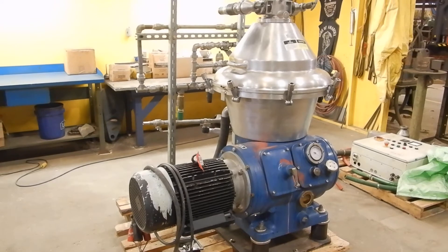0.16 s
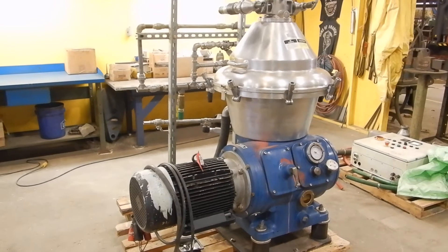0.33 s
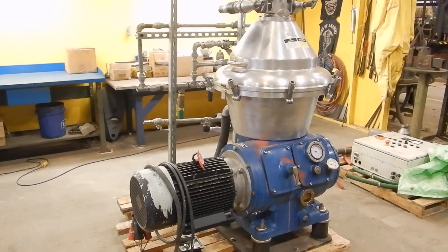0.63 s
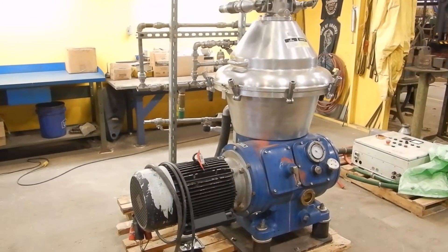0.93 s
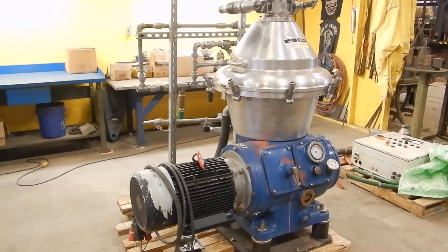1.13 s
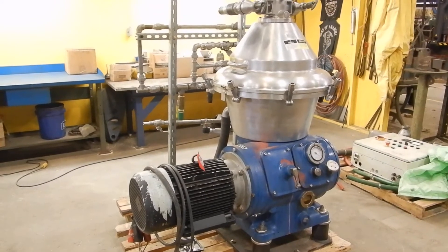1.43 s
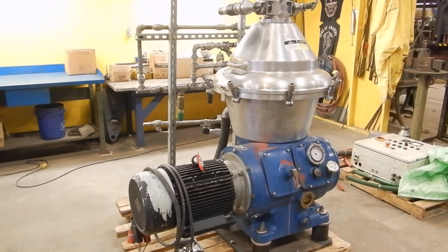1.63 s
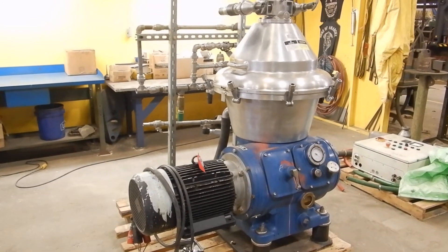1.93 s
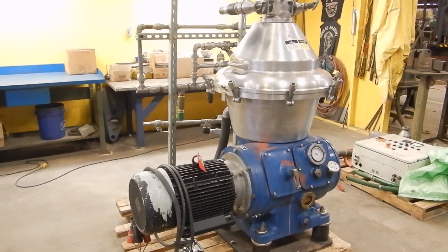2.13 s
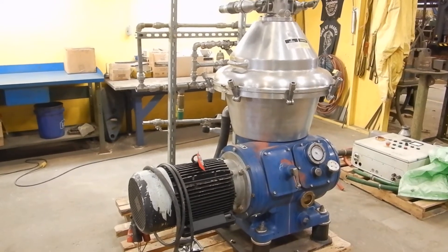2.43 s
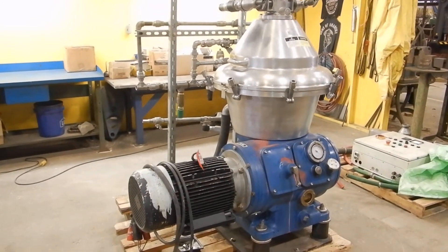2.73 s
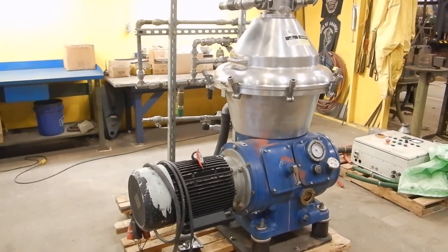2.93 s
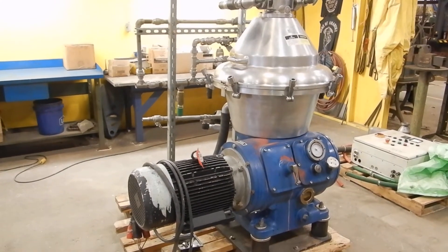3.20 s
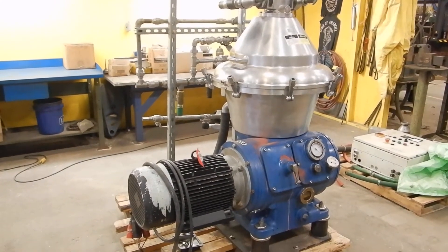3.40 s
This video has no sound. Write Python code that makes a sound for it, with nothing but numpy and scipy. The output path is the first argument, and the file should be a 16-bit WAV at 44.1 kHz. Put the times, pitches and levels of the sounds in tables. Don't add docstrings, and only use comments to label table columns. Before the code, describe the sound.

Close to a running centrifuge indoors: a continuous, shrill, rough-edged whine with a slight cyclic waver, fine gear rattle around it, and a fitful low drone, motor hum and rushing noise beneath.

```python
import sys
import numpy as np
from scipy import signal
from scipy.fft import rfft, irfft, next_fast_len
from scipy.io import wavfile

SR = 44100
rng = np.random.default_rng(int(sys.argv[2]) if len(sys.argv) > 2 else 0)


def wav_out(sig):
    wavfile.write(sys.argv[1], SR, np.round(np.clip(np.atleast_2d(sig).T, -1, 1) * 32767).astype(np.int16))


def attenuation_scalar(level_db):
    decades = np.asarray(level_db, float) / 20
    return 10 ** decades


N = 156996
TIME = np.arange(N) / SR
PAD = next_fast_len(N + 4096)
HZ = np.arange(PAD // 2 + 1) * SR / PAD

CATCH_S = [-.02, .311, .652, 1.006, 1.375, 1.757, 2.169, 2.586, 3.034, 3.518, 4.02]
# place in cycle (0-1), mesh offset f/Hz
HUNT = [
    (0, 0),
    (.07, 12.),
    (.2, 6.5),
    (.45, 1.8),
    (.72, -10.5),
    (.9, -10.),
    (1, 0),
]

MESH_HZ, OCTAVE_HZ = 1662.4, 3322.0
MESH_OFFSETS = [-197.3, -178.7, -144.6, -86.7, -52.7, -45.5, -37.5, -28.9, -18.6, -7.6, 0, 7.7, 15.5, 26.3,
                34, 52.7, 60.5, 68.1, 79.2, 86.7, 94.5, 120.6, 139.4, 192.2, 207.7, 317.8, 404.5]
# level/dB, swell/dB, place of swell in cycle (0-1), unsteadiness (0-1)
MESH_TONES = [(-43, 2.5, 0.5, 0.3), (-43, -1.5, .75, 0.7), (-34, 3, 0.31, 0.2), (-46, 4.5, 0.5, .4),
              (-31.5, -0.5, 0.1, 0.1), (-42, 0.5, 0.7, 0.4), (-38.5, 2.5, 0.7, 0.5), (-38, 10.5, .25, 0.4),
              (-29, 0.5, 0.7, 0.5), (-40.5, 3, .05, 0.6), (-21, 2, 0.75, 0.04), (-42, 3.5, 1, 0.5),
              (-41.5, -1.8, .9, .7), (-35.5, 4, 0.7, 0.4), (-29.5, 2, 1, 0.3), (-43.5, 9, .05, 0.6),
              (-40.5, -1, .4, .6), (-39.5, 1.5, .6, 0.5), (-39.5, 1, 0, 0.9), (-25, 2.5, 0.66, 0.12),
              (-41.5, 1.5, 0.1, 0.5), (-43.5, 1.5, 0.7, 0.8), (-37.5, 2, 0.2, 0.5), (-39.5, 3.5, 0, .5),
              (-40.5, -0.5, .75, .5), (-34, 3, 0.68, 0.21), (-48, 2, 0.4, 0.4)]
OCTAVE_OFFSETS = [-144.3, -115.4, -84, -39.6, -28.6, -18.1, 0, 8.4, 55.9, 86.9, 113.4, 147, 205.5, 233.8,
                  320.5, 406.9]
# level/dB, swell/dB, place of swell in cycle (0-1), unsteadiness (0-1)
OCTAVE_TONES = [(-53.5, 4.5, .6, 0.3), (-53.5, 3.5, .48, .5), (-51, 5, 0.8, .4), (-55.5, 2.5, .9, .6),
                (-53.5, 7.5, .45, 0.4), (-51, 8, 0.9, 0.4), (-47, 3, .55, 0.2), (-52.5, 3.5, 0.7, 0.7),
                (-61.5, -2.5, .3, 0.8), (-56, 3, 0.8, 0.7), (-49.5, 6, 0.6, 0.3), (-51.5, 4.5, 0.5, 0.7),
                (-53, 2.5, 1, 0.5), (-46.5, 8.5, 0.77, .4), (-49, 7.5, .45, 0.9), (-59.5, 9, 0.6, .5)]
# f/Hz, width/Hz, level/dB, swell/dB, place of swell in cycle (0-1)
RATTLE = [
    (1690, 160, -28.5, 0, 1),
    (1756, 700, -33.5, 0.7, 0.4),
    (3406, 700, -40.5, 2.5, 0.57),
]

# f/Hz, rms level/dB
HUM = [(86.1, -58), (290.7, -50.5), (344.5, -47), (409.1, -37), (694.4, -50.5), (872.1, -47), (931.3, -49),
       (1244, -48.5)]
# t/s, level/dB
DRONE = [(0.0, -39), (0.03, -32.5), (0.21, -42), (0.51, -30.5), (0.57, -34.5), (0.79, -29), (0.98, -36.5),
         (1.72, -48.5), (1.99, -33.5), (2.22, -49), (2.33, -35.5), (3.04, -40.5), (3.12, -32),
         (3.56, -48.5)]
DRONE_HZ = 407.7

# f/Hz, level/dB per Hz
RUSH_LOW = [(12, -61), (20, -32.5), (114, -15), (178, -7), (298, -6), (403, -3), (618, -11.5), (836, -5.5),
            (1400, -8), (1820, -39.5), (3080, -120)]
# f/Hz, level/dB per Hz
RUSH_HIGH = [(1240, -32), (2100, -9), (2860, -11.5), (3430, -2), (3910, -16.5), (5070, -11.5),
             (5710, -21.5), (6750, -25.5), (9260, -41), (12000, -74.5), (20400, -120)]
# f/Hz, width/Hz, lift/dB
CASING = [(57, 12, 0), (201, 62, 4), (444, 21, 7), (823, 47, 4.5), (1094, 80, 5.5), (1218, 100, 6.5),
          (2620, 44, 10), (4210, 290, 7), (5020, 340, 3.5), (6770, 300, 4.5), (7560, 170, 6),
          (8500, 150, 4), (10000, 590, -13), (10800, 500, 4)]

# f/Hz, likeness (0-1)
LIKENESS = [(30, .68), (60, .92), (125, .965), (300, .985), (1000, .975), (3000, .93), (5500, .75),
            (9000, .3)]
# f/Hz, left minus right level/dB
LEAN = [(60, -0.5), (140, -1.3), (320, -0.28), (730, -1.8), (1670, -1.7), (3840, 0.19), (8810, -0.5)]
PORT_LAG_S = 3.0e-5
PORT_SIGN = np.array([[1], [-1]])

SNAP_DB, SNAP_WIDTH, SNAP_PLACE = -3, 0.042, 0.042
ROOM_SHARE = 0.11
ALIGNED_S = -1.0
WANDER_PER_S = 3.04


def rms_one(x):
    return x / np.sqrt(np.mean(x ** 2) + 1e-20)


def at_hz(points):
    hz, value = np.transpose(points)
    return np.interp(np.log(HZ + 1), np.log(hz), value)


def resonance(hz, width):
    return 1 / (1 + (2 * (HZ - hz) / width) ** 2)


def drift(rate):
    step = 40
    pole = np.exp(-2 * np.pi * rate * step / SR)
    white = rng.standard_normal(N // step + 2002)
    slow = signal.lfilter([1], [1, -2 * pole, pole * pole], white)[2000:]
    return np.interp(np.arange(N) / step, np.arange(len(slow)), rms_one(slow))


def port_phase(hz):
    return np.exp(1j * np.pi * hz * PORT_LAG_S * PORT_SIGN)


def stereo_noise(gain):
    mid, side = rfft(rng.standard_normal((2, PAD))) * gain
    alike = np.clip(at_hz(LIKENESS), 0, 1)
    ports = attenuation_scalar(PORT_SIGN * at_hz(LEAN) / 2) * port_phase(HZ)
    field = np.sqrt(1 + alike) * mid + PORT_SIGN * np.sqrt(1 - alike) * side
    return rms_one(irfft(ports * field, PAD)[:, :N])


def hunting_cycle():
    return np.interp(TIME, CATCH_S, np.arange(len(CATCH_S)))


def swell(depth_db, place):
    around = np.cos(2 * np.pi * (hunting_cycle() - place))
    return attenuation_scalar(depth_db * (around - depth_db / 17))


def tone(turns, hz, db, unsteady, lean_db):
    chance = drift(WANDER_PER_S) + 1j * drift(WANDER_PER_S)
    direct = (1 + unsteady * chance) / np.sqrt(1 + 2 * unsteady ** 2)
    wander = direct + PORT_SIGN * ROOM_SHARE * chance[::-1]
    ports = attenuation_scalar(PORT_SIGN * lean_db / 2) * port_phase(hz)
    return np.sqrt(2) * attenuation_scalar(db) * (ports * wander * np.exp(2j * np.pi * turns)).real


def rush():
    lift = sum(db * resonance(hz, width) for hz, width, db in CASING)
    upper = 1 / (1 + (1700 / (HZ + 1)) ** 8)
    low = stereo_noise(attenuation_scalar(at_hz(RUSH_LOW) + lift) * (1 - upper))
    patches = attenuation_scalar(-36.5 + 1 * drift(5.0))
    high = stereo_noise(attenuation_scalar(at_hz(RUSH_HIGH) + lift) * upper)
    return attenuation_scalar(-31.5) * low + patches * high


def hum():
    out = 0
    for hz, db in HUM:
        if abs(hz - DRONE_HZ) > 20:
            out = out + tone(hz * TIME + rng.random(), hz, db, .6, -.6)
    return out


def cover_drone():
    envelope = attenuation_scalar(np.interp(TIME, *np.transpose(DRONE)))
    return envelope * tone(DRONE_HZ * TIME, DRONE_HZ, -0.46, .12, -.3)


def rattle():
    out = 0
    for hz, width, db, depth, place in RATTLE:
        out = out + attenuation_scalar(db) * swell(depth, place) * stereo_noise(resonance(hz, width))
    return out


def gears():
    cycle = hunting_cycle()
    bend = np.cumsum(np.interp(cycle % 1, *np.transpose(HUNT))) / SR
    families = [(1, MESH_HZ, MESH_OFFSETS, MESH_TONES, -2),
                (2, OCTAVE_HZ, OCTAVE_OFFSETS, OCTAVE_TONES, -0.5)]
    out = 0
    for order, centre, offsets, rows, lean_db in families:
        for offset, (db, depth, place, unsteady) in zip(offsets, rows):
            hz = centre + offset
            turns = hz * (TIME - ALIGNED_S) + order * bend
            out = out + swell(depth, place) * tone(turns, hz, db, unsteady, lean_db)
    from_snap = (cycle - SNAP_PLACE + .5) % 1 - .5
    return out * attenuation_scalar(SNAP_DB * np.exp(-(from_snap / SNAP_WIDTH) ** 2))


def scene():
    return rush() + hum() + cover_drone() + rattle() + gears()


def roll_off(x):
    return signal.sosfilt(signal.butter(12, 15600, fs=SR, output="sos"), x)


def record(dry):
    return roll_off(dry)


dry = scene()
out = record(dry)
wav_out(out)
```